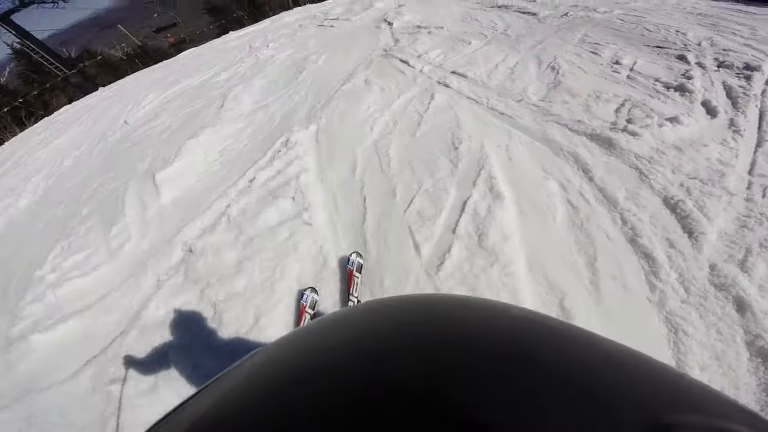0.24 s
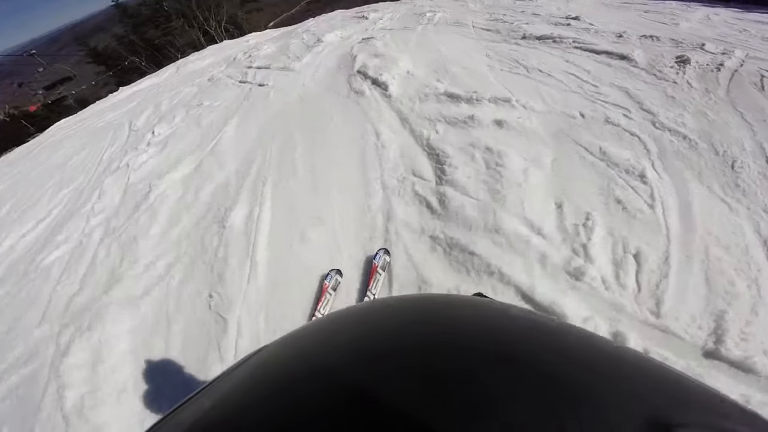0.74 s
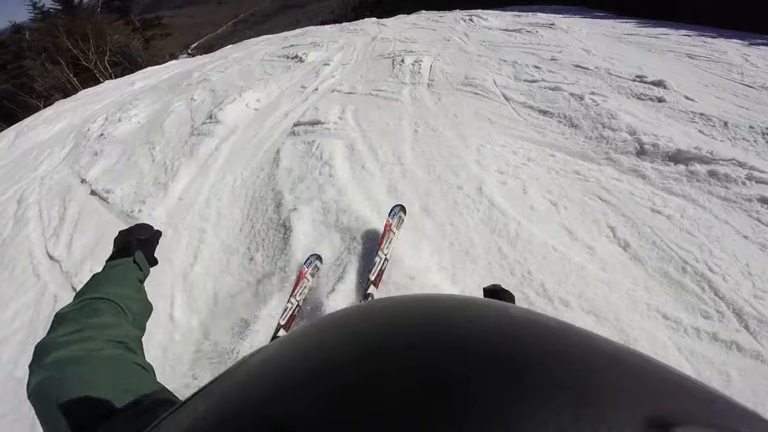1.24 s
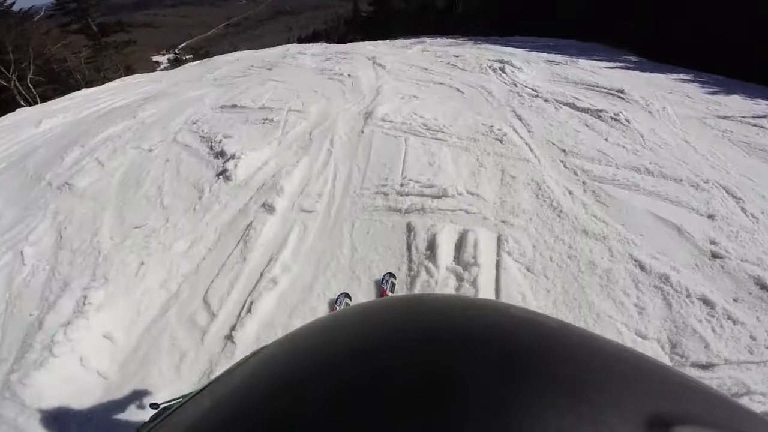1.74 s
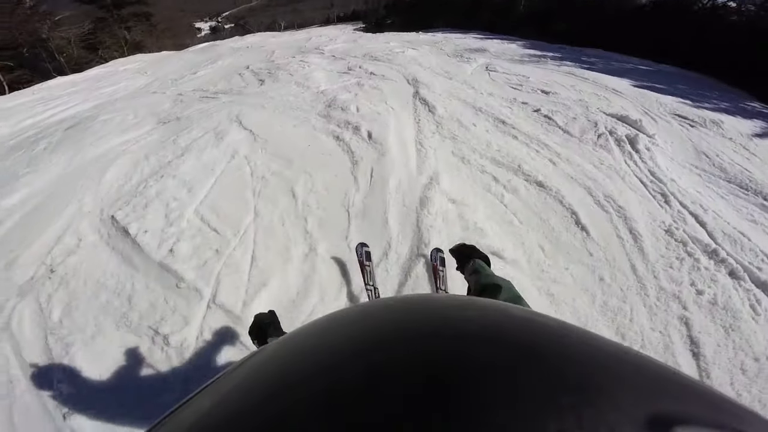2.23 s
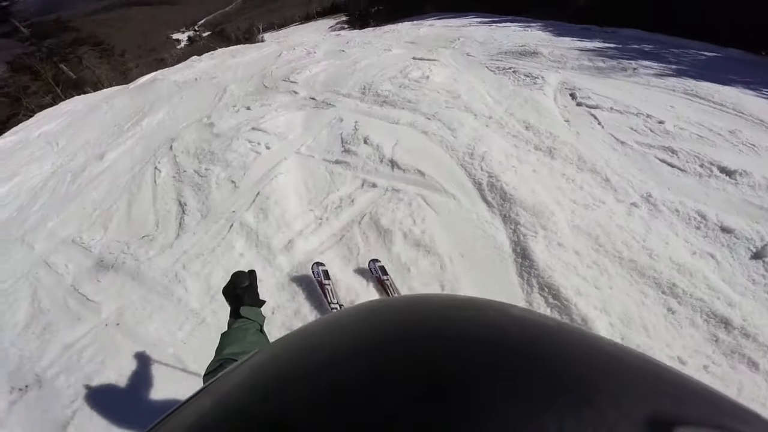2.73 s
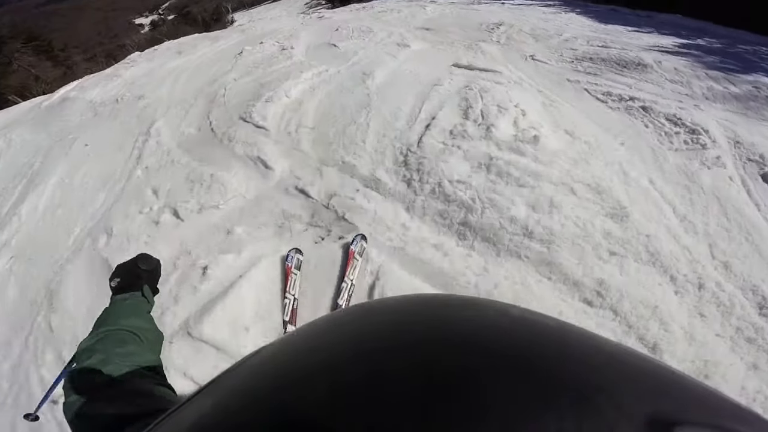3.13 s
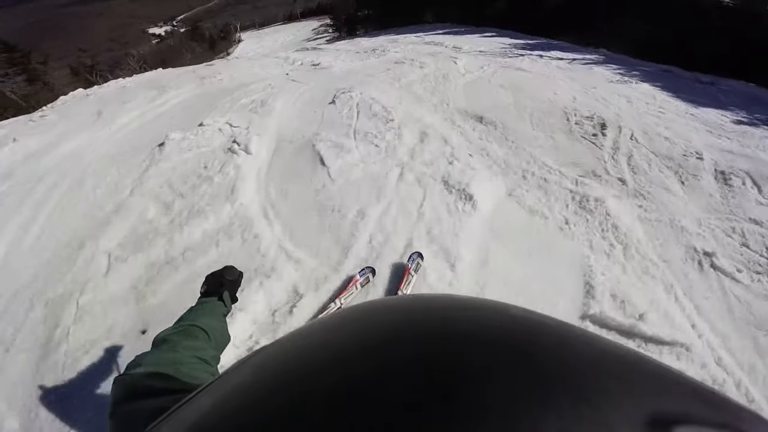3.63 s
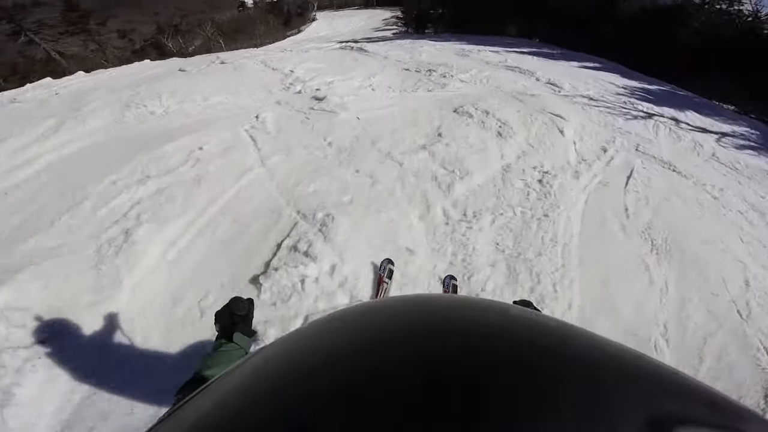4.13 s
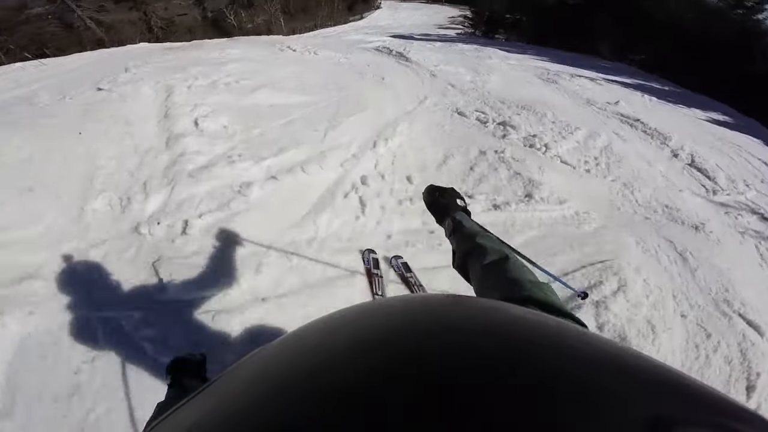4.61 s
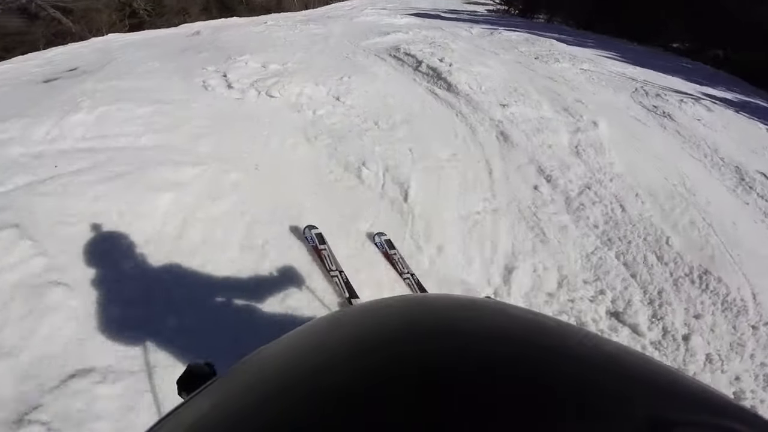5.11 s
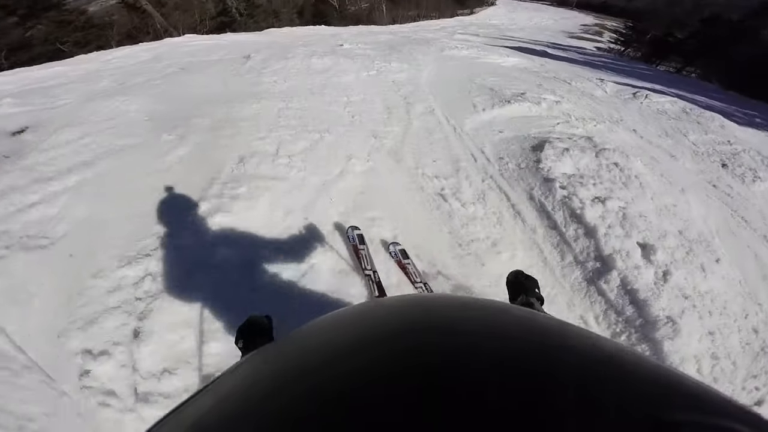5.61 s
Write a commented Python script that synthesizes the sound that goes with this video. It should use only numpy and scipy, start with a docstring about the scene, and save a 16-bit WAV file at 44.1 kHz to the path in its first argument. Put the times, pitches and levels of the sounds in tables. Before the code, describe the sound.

Heard from a cased camera worn by the skier: continuous coarse snow scraping, strongest early, quieter in the middle, and swelling again around five seconds. Edges rasp in short pitched bands, loose snow hisses in puffs, gear clacks on hard lumps, and bumps make deep, dull thuds in the mount. Gusts press on the case in low rumbles; open slope, no echo.

```python
"""Skis run down firm snow, heard at a small cased camera on the skier's helmet.
From the start crushed grains scrape, coloured by the case; jolts rock the mount and a blow clacks the gear.
Edges then rasp in narrow bands and sizzle in carves; near 2 s the scrape eases and plumes of spray hiss.
From 3 s jolts crowd in again, and from 4 s looser snow adds powder hiss; the hardest jolts come after 5 s.
Throughout, eddies buffet the case in gusts and the mount rumbles."""
import sys
import numpy as np
from scipy import signal
from scipy.fft import rfft, irfft
from scipy.io import wavfile
from scipy.ndimage import uniform_filter1d

SR = 44100
rng = np.random.default_rng(int(sys.argv[2]) if len(sys.argv) > 2 else 0)


def unload_audio(sound):
    """Save the sound as a 16-bit wav file, at the path given as the first command line argument."""
    columns = np.transpose(np.atleast_2d(sound))
    # keep every value between -1 and 1, then stretch to whole-number steps
    steps = np.round(np.clip(columns, -1, 1) * 32767)
    wavfile.write(sys.argv[1], SR, steps.astype(np.int16))


N = 258426
T = np.arange(N) / SR  # s
FREQS = np.maximum(np.arange(N // 2 + 1) * SR / N, 1)  # Hz


def undb(db):
    """Decibels to gain."""
    return 10 ** (np.asarray(db) / 20)


def unit(x):
    """Scale to rms 1."""
    return x / np.sqrt(np.mean(x ** 2))


def colour(points):
    """Gain over frequency, interpolated in dB over log frequency."""
    freq_hz, gain_db = np.transpose(points)
    return undb(np.interp(np.log(FREQS), np.log(freq_hz), gain_db))


def band(low_hz, high_hz, order=8):
    """Gain of a steep band-pass."""
    low_side = (low_hz / FREQS) ** (2 * order)
    high_side = (FREQS / high_hz) ** (2 * order)
    return ((1 + low_side) * (1 + high_side)) ** -.5


def resonance(freq_hz, q):
    """Complex response of one damped mode: it rings only after the blow."""
    return 1 / (1 + 1j * q * (FREQS / freq_hz - freq_hz / FREQS))


def shape(x, gain):
    """Filter a sound with a gain over frequency."""
    return irfft(rfft(x) * gain, N)


def walk(rate_hz):
    """Random levels held for 1 / rate_hz and slewed twice; spread near 1."""
    step = max(int(SR / rate_hz), 1)
    held = rng.standard_normal(N)[np.arange(N) // step]
    slewed = uniform_filter1d(held, step)
    return 1.2 * uniform_filter1d(slewed, step)


def hold(start_s, end_s, fade_s):
    """Envelope that fades in around the start, holds, and fades out around the end."""
    return np.clip(np.minimum(T - start_s, end_s - T) / fade_s + .5, 0, 1)


def swells(table, fade_s):
    """Sum of held dB changes from rows of start_s, end_s, change_db."""
    return sum(change_db * hold(start_s, end_s, fade_s) for start_s, end_s, change_db in table)


def grains(rate_hz, spread_db, hiss):
    """Snow grains break at random moments and strengths, over a hiss of countless smaller ones."""
    moments = rng.random(N) < rate_hz / SR
    signs = rng.choice([-1, 1], N)
    strengths = undb(spread_db * rng.standard_normal(N))
    return unit(moments * signs * strengths) + hiss * rng.standard_normal(N)


# ski plumes of loose snow: start_s, end_s, change_db of spray
PLUMES = [(0.15, 0.56, 3), (0.96, 1.48, 3), (1.93, 2.05, 2.5), (2.51, 2.76, 1.5), (3.02, 3.70, 2.5),
          (3.70, 3.98, 2.2), (4.39, 4.54, 3.5), (4.96, 5.9, 3.5)]
# skis light over a bump, spray thins: start_s, end_s, change_db of spray
LIFTS = [(2.82, 3.01, -2), (3.27, 3.34, -6), (5.14, 5.24, -4)]
# skis slip sideways with a lower rasp: start_s, end_s, change_db of skid
SKIDS = [(0.0, 0.3, 2.5), (0.68, 0.95, 0.5), (3.02, 3.35, 3.5), (4.38, 4.55, 4), (5.1, 5.22, 0.5)]
PLUME_FADE_S, LIFT_FADE_S, SKID_FADE_S = 0.061, 0.025, 0.078
LOOSE_FROM_S, LOOSE_DB = 4.05, 3.5  # looser snow from here: extra powder
# _DB: level in an easy glide; _PER_LOAD: dB per dB of edge load; _PER_THROWN: dB per dB of thrown snow
SCRAPE_DB, GRIT_DB, GRIT_PER_THROWN = -39.5, -49, 0.64
SKID_DB, SKID_PER_LOAD = -48.5, 1.16
SPRAY_DB, SPRAY_PER_LOAD = -55, 1.0
POWDER_DB, POWDER_PER_LOAD = -72, 0.62


def skis(load_db):
    """Loaded edges scrape and skid; thrown snow hisses above, swelling in plumes and thinning in lifts."""
    case, pressure = case_gain(), grip()
    thrown_db = swells(PLUMES, PLUME_FADE_S) + swells(LIFTS, LIFT_FADE_S)
    loose_db = LOOSE_DB * hold(LOOSE_FROM_S, np.inf, PLUME_FADE_S)

    crushed = grains(rate_hz=2500, spread_db=2.0, hiss=1.0) * pressure
    skidded = grains(rate_hz=1200, spread_db=5.0, hiss=1.0) * pressure
    sprayed = grains(rate_hz=5000, spread_db=5, hiss=1.3) * pressure
    powdered = grains(rate_hz=4000, spread_db=6.5, hiss=0.96) * pressure

    scrape = unit(shape(crushed, case * band(1245, 2620)))
    grit = unit(shape(crushed, case * band(2895, 4100)))
    skid = unit(shape(skidded, case * band(388, 1197)))
    spray = unit(shape(sprayed, case * band(3940, 9600)))
    powder = unit(shape(powdered, case * band(9960, 14300)))
    return (scrape * undb(SCRAPE_DB + load_db)
            + grit * undb(GRIT_DB + load_db + GRIT_PER_THROWN * thrown_db)
            + skid * undb(SKID_DB + SKID_PER_LOAD * load_db + swells(SKIDS, SKID_FADE_S))
            + spray * undb(SPRAY_DB + SPRAY_PER_LOAD * load_db + thrown_db)
            + powder * undb(POWDER_DB + POWDER_PER_LOAD * load_db + thrown_db + loose_db))


def grip():
    """Edge pressure from moment to moment: quick chatter, slower unevenness, clods that burst and fade."""
    clods = (rng.random(N) < 14 / SR) * rng.random(N)  # 14 per second
    crunch = signal.lfilter([1], [1, -np.exp(-1 / (0.075 * SR))], clods)  # 75 ms decay
    uneven_db = 0.32 * walk(70) + 0.19 * walk(10)
    return unit(undb(uneven_db) * (1 + 0.31 * crunch))


# crushed snow through the case wall: freq_hz, gain_db
SNOW = [(300, -12), (550, -18), (940, -17), (1090, -8), (1350, -5), (2000, -4.5), (2680, -7), (2830, -13),
        (4250, -18), (4700, -27.5), (6800, -29), (9100, -30), (9550, -38), (15000, -46)]
# case resonances: freq_hz, width_hz, lift_db
CASE = [(1350, 162, 6.5), (1530, 265, 8), (1988, 270, 5), (2358, 190, 4), (2643, 230, 4.5), (3057, 136, 6),
        (3410, 156, 5.5), (3873, 81, 5.5), (4975, 220, 6), (5927, 430, 12), (6390, 250, 5), (7300, 320, 2),
        (8560, 800, 1.5), (10340, 450, 4.5)]


def case_gain():
    """Snow noise as it sounds inside the case: a broad hump with resonances on it."""
    total_db = sum(lift_db / (1 + (2 * (FREQS - freq_hz) / width_hz) ** 2)
                   for freq_hz, width_hz, lift_db in CASE)
    return colour(SNOW) * undb(total_db)


# an edge bites and rasps around one pitch: start_s, end_s, centre_hz, level_db
BITES = [(0.487, 0.72, 1530, -41), (0.8, 1.075, 1560, -47), (0.97, 1.232, 2150, -40),
         (1.229, 1.472, 1250, -37), (1.28, 1.325, 1010, -46), (3.205, 3.31, 1530, -45),
         (4.298, 4.71, 1430, -43)]
# carved turns, the steel edge sizzles: start_s, end_s
CARVES = [(0.70, 1.58), (3.08, 3.27), (3.38, 3.70)]
BITE_Q, BITE_FADE_S = 5.2, 0.045
SIZZLE_HZ, SIZZLE_Q, SIZZLE_DB = 8530, 7.5, -62.5


def bites(flutter_db=1.0):
    """A digging edge grips and slips in a narrow band while it holds; in a carve it sizzles high up."""
    crust = grains(rate_hz=1900, spread_db=4, hiss=0.79) * undb(flutter_db * walk(45))

    def rasp(centre_hz, q):
        """Crust noise narrowed by a resonance, without its phase."""
        return unit(shape(crust, np.abs(resonance(centre_hz, q)) ** 2))

    biting = sum(undb(level_db) * hold(start_s, end_s, BITE_FADE_S) * rasp(centre_hz, BITE_Q)
                 for start_s, end_s, centre_hz, level_db in BITES)
    carving = sum(hold(start_s, end_s, BITE_FADE_S) for start_s, end_s in CARVES)
    return biting + undb(SIZZLE_DB) * carving * rasp(SIZZLE_HZ, SIZZLE_Q)


# jolts of the mount: start_s, peak_db, pitch_hz
JOLTS = [(0.027, -20.5, 102.6), (0.191, -16.5, 107), (0.24, -21, 116), (1.23, -27.5, 105),
         (1.419, -32.5, 95), (1.582, -27.5, 120), (2.168, -31, 108), (2.236, -16, 107.4), (2.618, -22, 116),
         (3.032, -17, 109), (3.084, -21.5, 104), (3.253, -22, 103), (3.650, -16.5, 110), (4.092, -21, 105),
         (4.466, -18.5, 105.3), (4.489, -24, 116), (5.29, -14, 106), (5.529, -13, 96.6),
         (5.552, -23.5, 104), (5.612, -23.5, 108), (5.834, -18, 112)]


def thumps(rise_s=0.0076, swell=1.32, shell_hz=245, shell_db=-19, shell_decay_s=0.0018):
    """Each bump rocks the camera on its mount for about three cycles; the helmet shell knocks faintly."""
    out, t = np.zeros(N), T[:SR // 10]
    envelope = (t / rise_s * np.exp(1 - t / rise_s)) ** swell
    chances = rng.standard_normal(len(JOLTS))
    for (start_s, peak_db, pitch_hz), chance in zip(JOLTS, chances):
        start = int(start_s * SR)
        rock = envelope * np.sin(2 * np.pi * pitch_hz * t)
        knock_hz = shell_hz * np.exp(0.19 * chance)
        shell = np.exp(-t / shell_decay_s) * np.sin(2 * np.pi * knock_hz * t)
        thump = undb(peak_db) * (undb(shell_db) * shell - rock)
        out[start:start + len(t)] += thump[:N - start]
    return out


# skis clack on hard lumps: start_s, peak_db of the knock, pitch_hz, crunch_db
CLACKS = [(0.029, -18.5, 1520, -46), (2.6292, -18, 1720, -27), (3.653, -26, 1320, -47),
          (4.1585, -20, 1350, -37.5), (4.499, -21, 1470, -35), (5.2887, -23, 1400, -44),
          (5.530, -31, 1320, -39)]
# a lump of crust breaking: freq_hz, gain_db
CRUNCH = [(120, 15), (260, 11.5), (650, -17.5), (1250, 1.5), (2500, -1.5), (4200, -15), (7000, -40),
          (15000, -60)]
CRUNCH_ATTACK_S, CRUNCH_DECAY_S = 0.0027, 0.014


def clacks(q=2.0, body_hz=2000, body_q=0.99):
    """A sharp blow rings the gear for a millisecond or two, while the lump crumbles in a short crunch."""
    out = np.zeros(N)
    crumbs = grains(rate_hz=2000, spread_db=2, hiss=0.6)
    crunch = unit(shape(crumbs, colour(CRUNCH)))
    for start_s, peak_db, pitch_hz, crunch_db in CLACKS:
        blow = 1. * (np.arange(N) == int(start_s * SR))
        knock = shape(blow, resonance(pitch_hz, q) ** 2 * resonance(body_hz, body_q))
        # rises just before the blow, decays after it
        crumble = np.exp(-np.maximum((start_s - T) / CRUNCH_ATTACK_S, (T - start_s) / CRUNCH_DECAY_S))
        out += undb(peak_db) * knock / np.abs(knock).max()
        out += undb(crunch_db) * crumble * crunch
    return out


# turbulence on the case: freq_hz, gain_db
BUFFET = [(4, 3.5), (10, 12.5), (16, 15), (26, 0.5), (40, -4), (60, -6.5), (100, -19), (200, -64)]
# rumble of the mount: freq_hz, gain_db
RUMBLE = [(30, -5.5), (60, -13.5), (85, 0), (112, 5), (135, 1), (160, -7.5), (220, -10.5), (290, -11.5),
          (370, -17), (600, -24.5), (900, -32), (2000, -59)]
# gusts on the case: start_s, end_s, change_db of buffeting
GUSTS = [(0.1, 0.42, 9.5), (1.14, 1.45, 1), (3.07, 3.3, 6), (3.4, 4.05, 4.5), (4.6, 5.05, 3.5),
         (5.3, 5.72, 8)]
GUST_FADE_S = 0.053
# _DB: level in an easy glide; _PER_LOAD, _PER_GUST: dB per dB of edge load, of gust
BUFFET_DB, BUFFET_PER_LOAD = -43, 0.98
RUMBLE_DB, RUMBLE_PER_LOAD, RUMBLE_PER_GUST = -40.5, 0.76, 0.16


def wind(load_db):
    """Slow eddies press on the case in gusts; faster ones and the rough ride keep the mount rumbling."""
    gust_db = swells(GUSTS, GUST_FADE_S)
    eddies = shape(rng.standard_normal(N), colour(BUFFET))
    buffet = eddies / np.std(shape(eddies, band(20, 55)))  # level set by the 20-55 Hz band
    steady = shape(rng.standard_normal(N), colour(RUMBLE))
    rumble = unit(steady * undb(1.45 * walk(35)))
    return (buffet * undb(BUFFET_DB + BUFFET_PER_LOAD * load_db + gust_db)
            + rumble * undb(RUMBLE_DB + RUMBLE_PER_LOAD * load_db + RUMBLE_PER_GUST * gust_db))


# how hard the edges press, on a scale of scrape level: time_s, level_db
EDGE = [(0.0, -30.5), (0.11, -35.5), (0.22, -34), (0.35, -36.5), (0.58, -32.5), (1.44, -34), (1.8, -40.5),
        (2.47, -39), (2.67, -37.5), (2.9, -40), (3.2, -38), (3.4, -39), (4.4, -37.5), (4.8, -37.5),
        (5.04, -35), (5.36, -35.5), (5.55, -38), (5.86, -36.5)]
GLIDE_DB = -37.5  # easy glide on that scale; load is the excess


def scene():
    """Skis, wind and the jolted mount at one microphone; the load on the edges drives the ride."""
    time_s, level_db = np.transpose(EDGE)
    load_db = np.interp(T, time_s, level_db) - GLIDE_DB
    return (skis(load_db) + bites() + thumps() + clacks() + wind(load_db))[None]


TOP_HZ = 15120


def record(dry):
    """The camera cuts the top of the treble; the sound eases in and out over 4 ms."""
    ease = np.clip(np.minimum(T, T[-1] - T) / .004, 0, 1)
    treble_cut = signal.ellip(10, .2, 80, TOP_HZ, fs=SR, output="sos")
    return signal.sosfilt(treble_cut, dry * ease)


dry = scene()
out = record(dry)
unload_audio(out)
```